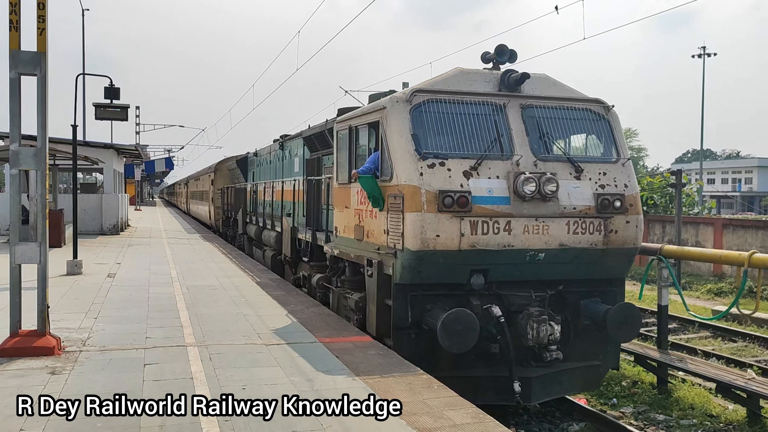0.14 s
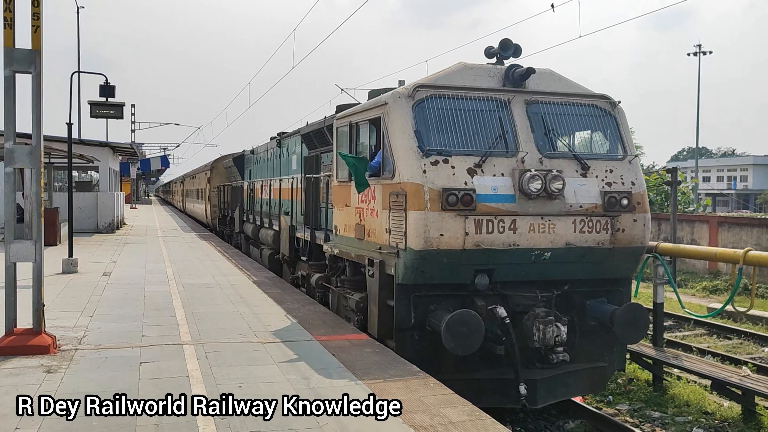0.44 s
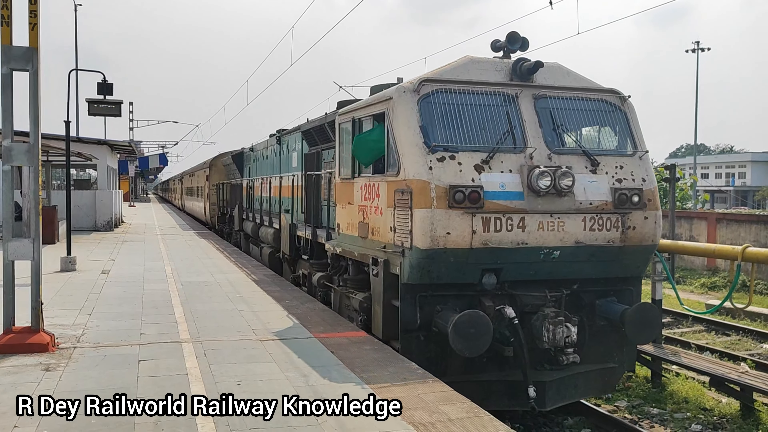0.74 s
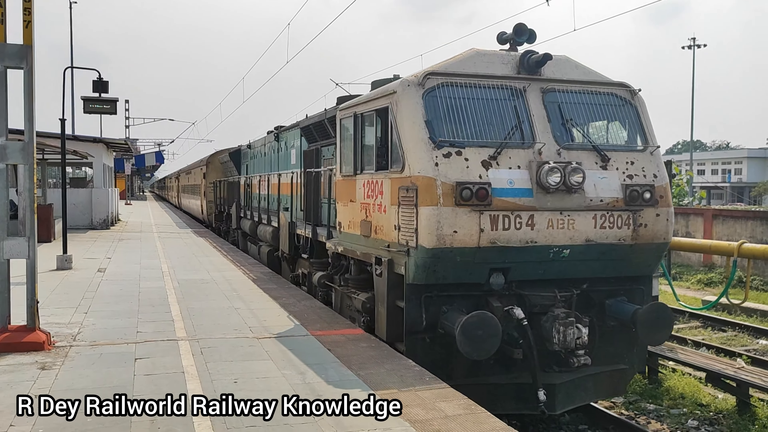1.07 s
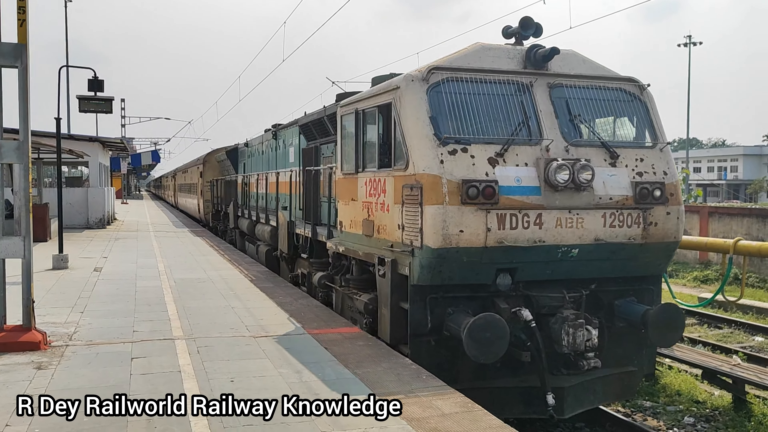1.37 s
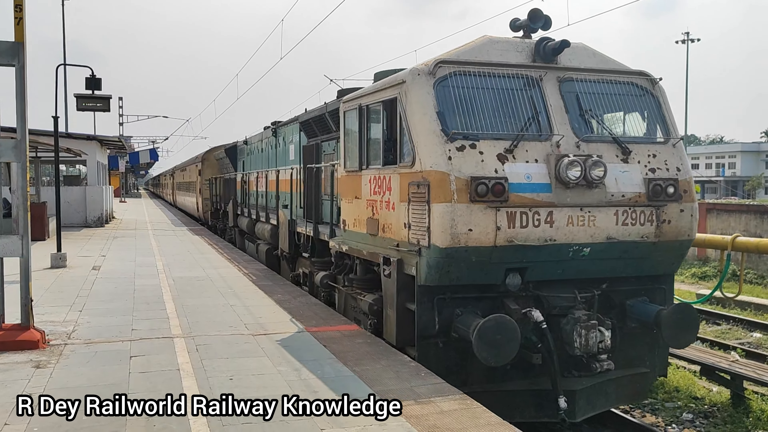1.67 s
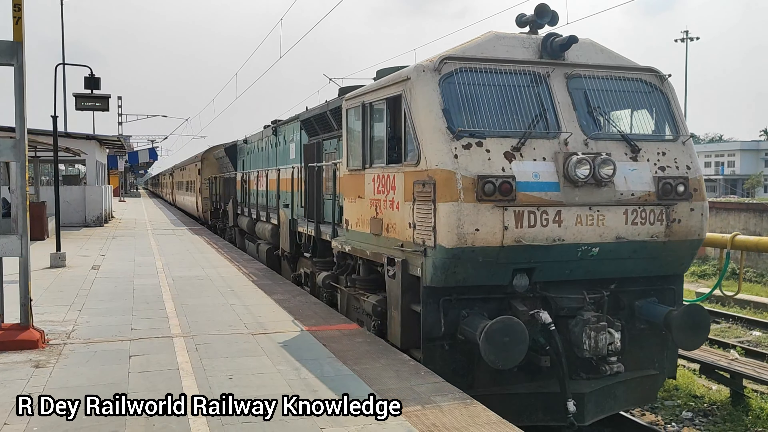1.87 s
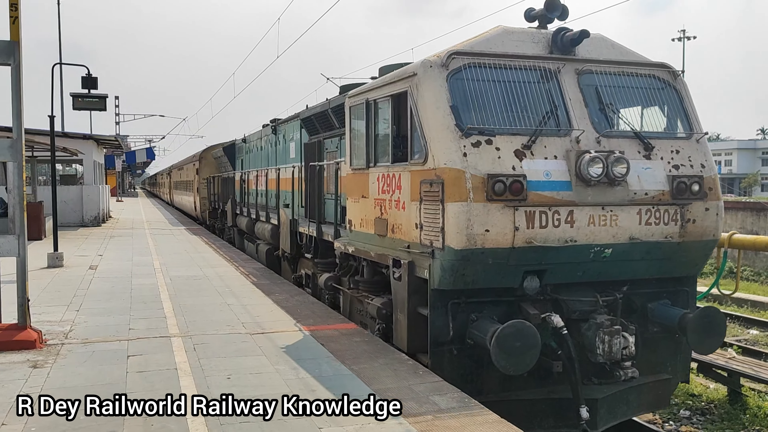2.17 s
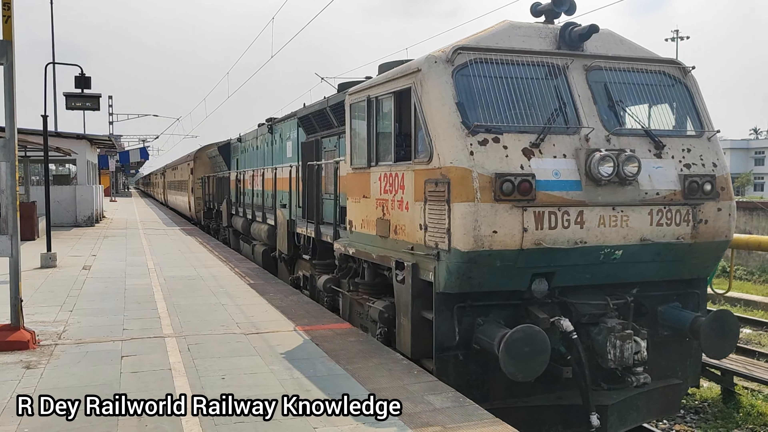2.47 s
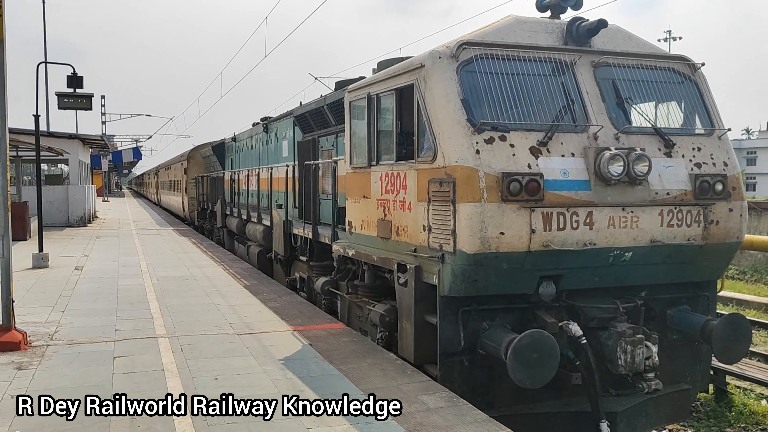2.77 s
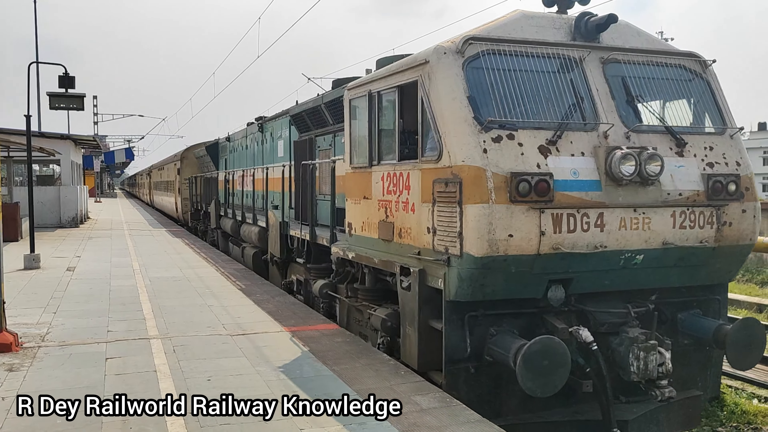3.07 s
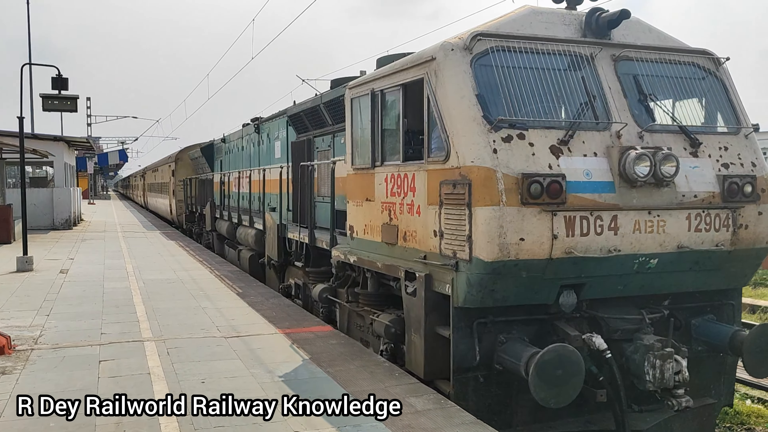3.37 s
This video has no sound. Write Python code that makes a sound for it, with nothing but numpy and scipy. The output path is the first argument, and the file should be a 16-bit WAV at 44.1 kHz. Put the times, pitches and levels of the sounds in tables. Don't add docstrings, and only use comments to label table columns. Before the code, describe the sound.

A big diesel locomotive creeps toward a station platform, its exhaust throbbing low and lumpy while whines swell and fade, steadily growing louder.

```python
import sys
import numpy as np
from scipy import signal
from scipy.fft import rfft, irfft, next_fast_len
from scipy.io import wavfile
from scipy.ndimage import uniform_filter1d, map_coordinates

SR = 44100
rng = np.random.default_rng(int(sys.argv[2]) if len(sys.argv) > 2 else 0)


def how_loud(loudness_db):
    steps = np.asarray(loudness_db, float) / 20
    return 10 ** steps


def pcm_store(signal):
    levels = np.round(np.clip(np.atleast_2d(signal), -1, 1) * 32767)
    wavfile.write(sys.argv[1], SR, levels.astype(np.int16).T)


N = 275226
T = np.arange(N) / SR
CRANK_HZ = 4.51
PORT_SHARE = np.array([[.5], [-.5]])


def unit(x):
    return x / np.sqrt(np.mean(x ** 2) + 1e-20)


def columns(rows, at, warp=lambda v: v):
    first, *rest = np.transpose(rows)
    return [np.interp(warp(at), warp(first), column) for column in rest]


def wobble(rate):
    coarse_time = T[::32]
    knots = rng.standard_normal(int(N * rate / SR) + 4)
    return np.interp(T, coarse_time, unit(map_coordinates(knots, [coarse_time * rate])))


def filtered(x, response):
    size = next_fast_len(len(x.T) + SR)
    spectrum = rfft(x, size) * response(np.fft.rfftfreq(size, 1 / SR))
    return irfft(spectrum, size)[..., :len(x.T)]


def resonances(modes):
    def response(f):
        total = 0
        for k, (centre, width, db) in enumerate(modes):
            mode = 1j * f * width / (centre * centre - f * f + 1j * f * width)
            total = total + (-1) ** k * how_loud(db) * mode
        return total
    return response


# frequency in Hz, likeness of the ports from 0 to 1,
# left lead in radians, left over right level in dB.
PORT_SPACING = [(29.8, 1, 0.051, 1.3), (127, 1, 0.064, 0.5), (290, 1, 0.11, -1), (730, 0.84, 0.58, 0.6),
                (1590, .6, 0.68, -0.2), (1880, 0.9, 1.8, 2.5), (2570, 0.2, 1.2, 2), (3000, .5, 3.1, 1.5),
                (3565, 0.2, 5.2, 0), (4210, .1, 4, -2.5), (6520, 0.4, 2.26, 7.5), (8980, 0, 4, -8.5),
                (15000, 0, 2.9, 1.5)]


def ports(direct, scattered):
    def response(hz):
        alike, lead, pan_db = columns(PORT_SPACING, hz, np.log1p)
        turn = np.arccos(np.clip(alike, -1, 1)) / 2
        offset = how_loud(PORT_SHARE * pan_db) * np.exp(1j * PORT_SHARE * lead)
        return np.cos(turn), np.sin(turn), offset
    mid = filtered(direct, lambda hz: response(hz)[0])
    side = filtered(scattered, lambda hz: response(hz)[1])
    return filtered(np.array([mid + side, mid - side]), lambda hz: response(hz)[2])


def rush(spectrum, patchy_db):
    z = signal.stft(rng.standard_normal((2, N)), nperseg=512)[2]
    patches = uniform_filter1d(rng.standard_normal(z.shape[1:]), size=5, axis=0)
    patches = uniform_filter1d(patches, size=10, axis=1)
    pair = signal.istft(z * how_loud(patchy_db * unit(patches)), nperseg=512)[1][:, :N]
    return unit(filtered(pair, lambda hz: how_loud(columns(spectrum, hz, np.log1p)[0])))


def tone(hz, fuzz_hz, rough, lead=0, pan_db=0):
    smear = np.array([wobble(fuzz_hz) + 1j * wobble(fuzz_hz) for port in PORT_SHARE]) / np.sqrt(2)
    share = np.clip(rough, 0, 1)
    carrier = np.exp(2j * np.pi * (hz * T + rng.random()))
    swing = (np.sqrt(1 - share) + np.sqrt(share) * smear) * carrier
    return np.sqrt(2) * how_loud(PORT_SHARE * pan_db) * np.real(swing * np.exp(1j * PORT_SHARE * lead))


def nearness_db():
    start_m, speed_m_s, gaining_m_s2 = 29, 0.74, .25
    return 20 * np.log10(start_m / (start_m - speed_m_s * T - gaining_m_s2 * T ** 2 / 2))


def fading(rest, swells=()):
    db, grows, flutter_db, rate = rest
    level = db + grows * nearness_db() + flutter_db * wobble(rate)
    for s, gain_db, half_s in swells:
        level = level + gain_db * np.exp(-((T - s) / half_s) ** 2)
    return level


# crank angle in degrees, strength in dB.
PUFFS = [(4.9, 0.9), (38.9, 2.3), (49.0, 2.0), (87.2, -1.2), (99.0, 0.4), (110.1, -0.7), (133.8, 1.2),
         (147.4, -4.2), (180.4, 0.9), (193.1, 0.2), (227.9, 5.3), (238.2, 1.9), (275.3, 2.2), (302.9, -4.4),
         (319.8, 1.8), (349.2, -14.1)]


def firings(scatter_db, scatter_s):
    angle, db = np.transpose(PUFFS)
    turns = np.arange(int(N / SR * CRANK_HZ) + 4)[:, None]
    s = (turns + angle / 360) / CRANK_HZ
    s = s + scatter_s * rng.standard_normal(s.shape)
    strength = how_loud(db + scatter_db * rng.standard_normal(s.shape))
    return np.bincount(np.round(s * SR).astype(int).ravel(), strength.ravel())


# frequency in Hz, width in Hz, level in dB.
STACK_MODES = [(35.4, 3.0, -56.3), (76.3, 10.9, -35.5), (92.0, 6.0, -30.6), (136, 9.0, -56),
               (176.2, 15.0, -59.6)]


def exhaust():
    ring = filtered(firings(scatter_db=.25, scatter_s=.00006), resonances(STACK_MODES))
    ring = unit(ring[round(2 * SR / CRANK_HZ):][:N])

    def approaching_band(hz):
        return 1 / (1 + (hz / 88) ** 20) / (1 + (50 / (hz + 1)) ** 20)
    low = filtered(ring, approaching_band)
    near = nearness_db()
    low_db = -25.5 + 1.07 + (2.74 - 0.52 * near) * near
    ring = how_loud(low_db) * low + how_loud(-22.5) * (ring - low)
    return ports(ring, 0.44 * ring)


# frequency in Hz, width in Hz, level in dB.
BLOCK_PANELS = [(228, 40, -4), (346, 60, -11), (394, 40, -8.5), (635, 38, -7), (725.4, 54, 0.5),
                (756, 60, -7)]
# teeth per crank turn, level in dB against the block.
GEAR_TRAIN = [(33, -20), (38, -29), (40, -15.5), (44, -19.5), (53, -17.5), (64, -23.5), (71, -23),
              (76, -17.5), (90, -18.5), (96, -22.5), (100, -21.5), (141, -19.5), (149, -17), (153, -12),
              (154, -13), (157, -33), (158, -14), (159, -15), (160, -35), (161, -17), (163, -14.5),
              (165, -20), (167, -16), (175, -24), (220.7, -20.5), (237, -21)]
# frequency in Hz, density in dB per Hz.
ROAR_COLOUR = [(20, -53), (35, -26), (52, -7.5), (85, -8.5), (120, -15), (170, -8.5), (330, -11.5),
               (500, -18.5), (620, -12.5), (720, -5.5), (850, -12), (1100, -20.5), (2200, -17), (2550, -24),
               (2750, -43.5), (3050, -55.5)]


def block():
    def panels(f):
        thin = (1j * f / (200 + 1j * f)) ** 2
        return resonances(BLOCK_PANELS)(f) * thin
    knock = unit(filtered(firings(scatter_db=4.0, scatter_s=.00005)[:N], panels))
    roar = rush(ROAR_COLOUR, patchy_db=0.78) * how_loud(0.28 * wobble(2.4) + 0.26 * wobble(20))
    gears = 0
    for teeth, db in GEAR_TRAIN:
        mesh_hz = teeth * CRANK_HZ * 1.0003
        gears = gears + how_loud(db + 2.2 * wobble(.8)) * tone(mesh_hz, 2, .08, lead=.4)
    body = ports(how_loud(-8) * knock + how_loud(1.5) * roar[0], how_loud(3) * roar[1])
    return how_loud(-30 + 1.14 * nearness_db()) * (body + gears)


# frequency in Hz, fuzz in Hz, left lead in radians, left over right in dB.
WHINE_PITCH = [
    (1492.9, 6, 1.0, 0),
    (2139, 30, 1.0, 2),
    (2188.7, 8, .9, 2),
    (2560.1, 6, .3, 1),
]
# level in dB, growth in dB per dB of nearness, flutter in dB,
# flutter rate per second.
WHINE_LEVEL = [
    (-46.5, 0.24, 0.2, 7.4),
    (-54, 1.9, 3.5, 14),
    (-50, 0.9, 2.1, 12),
    (-53, 0.76, 2, 9.9),
]
# time in seconds, gain in dB, half length in seconds.
LOW_GEAR_SWELLS = [
    (.55, 2.5, 0.33),
    (2.4, 3, 1),
    (4.3, 4.5, 1),
    (6.17, 4, 0.065),
]
HIGH_GEAR_SWELLS = [(1.41, 11, 0.061), (1.74, 4.4, 0.08), (2.1, 12, 0.074), (2.8, 11.5, .08),
                    (3.369, 8.4, 0.15), (4.15, 9, 0.45), (5.1, 5.8, 0.48), (5.6, 8.9, 0.045),
                    (5.95, 7.4, 0.099)]
PINION_SWELLS = [(.5, 6.4, .3), (1.78, 11.6, 0.14), (2.3, 5.2, 0.26), (2.62, 7.2, 0.13), (3.3, 3.3, 0.16),
                 (4.2, 4.3, .12), (5.03, 10.4, 0.1), (5.3, 8.9, 0.028), (6.1, 6.3, 0.036)]
GENERATOR_SWELLS = [(.5, 7.8, 0.12), (1.25, 10, 0.24), (1.68, 8.3, 0.076), (2.4, 9, 0.26),
                    (2.8, 5.6, 0.048), (3.4, 6, 0.19), (3.9, 7, 0.27), (4.65, 6.3, 0.54), (5.3, 5.3, 0.065),
                    (5.87, 7.3, 0.045), (6.1, 5.1, .07)]


def whines():
    swells = [LOW_GEAR_SWELLS, HIGH_GEAR_SWELLS, PINION_SWELLS, GENERATOR_SWELLS]
    total = 0
    for (hz, fuzz_hz, lead, pan_db), rest, swell in zip(WHINE_PITCH, WHINE_LEVEL, swells):
        rough = np.clip(fuzz_hz / 55, 0, 1)
        total = total + how_loud(fading(rest, swell) + 3.5) * tone(hz, fuzz_hz, rough, lead, pan_db)
    return total


# time in seconds, gain in dB,
# half length in seconds.
BLADE_SWELLS = [(.08, 8.5, 0.11), (.3, 4.5, .06), (.7, 3.5, 0.26), (1.13, 7.5, 0.04), (1.29, 7.5, 0.051),
                (1.65, 8.5, .1), (2.07, 7, 0.18), (2.3, 6.5, .1), (2.57, 4, 0.039), (2.19, -24, 0.018),
                (3.06, -13, 0.022), (3.13, 6, 0.11), (3.421, -16, 0.023), (3.85, 9, 0.28), (4.26, 8.5, .04),
                (4.41, 5, 0.03), (4.9, 11.5, 0.34), (5.16, 4, 0.039), (5.46, 7.5, .1), (6.1, 8, 0.046)]
# frequency in Hz, fuzz in Hz, level in dB, left over right in dB,
# smeared share from 0 to 1.
FAN_TONES = [(4336, 86, -56, 3, 0.52), (6500, 110, -67, 4, 0.62), (7960, 50, -69.5, -10, 0.93),
             (12459, 50, -75, -7, .85), (13644, 200, -80, -5, .85)]


def turbo():
    blade_hz = 3990.2
    blade_db = fading((-56.5, 0.5, -0.2, 11), BLADE_SWELLS)
    third_db = fading((-69.5, 3, -0.5, 12))
    blade = how_loud(blade_db + 7.5) * tone(blade_hz, 60, 0.09, lead=-1.69)
    third = how_loud(third_db + 4.0) * tone(3 * blade_hz, 160, .85, lead=-0.47, pan_db=-6.5)
    fans = 0
    for hz, fuzz_hz, db, pan_db, rough in FAN_TONES:
        fans = fans + how_loud(db) * tone(hz, fuzz_hz, rough, lead=2.4, pan_db=pan_db)
    return blade + third + fans


# frequency in Hz, density in dB per Hz.
HISS_COLOUR = [(2600, 5), (3000, 1.5), (3700, -1), (4000, 7), (4400, -7), (4800, -8), (6600, -6.5),
               (7100, -12.5), (7450, -31), (8450, -20), (8900, -6.5), (11500, -14), (12000, -9.5),
               (12700, -14.5), (15500, -30)]


def air():
    closeness = (T / T[-1]) ** 2
    puff = np.exp(2.2 * (np.cos(2 * np.pi * (CRANK_HZ * T - .04)) - 1))
    puff_db = closeness * (2.5 * puff + 2.6 * puff ** 12)
    hiss_db = -59 + 15.5 + 1.2 * nearness_db()
    return how_loud(hiss_db + puff_db + 0.42 * wobble(13)) * ports(*rush(HISS_COLOUR, patchy_db=1.5))


def scene():
    return exhaust() + block() + whines() + turbo() + air()


# frequency in Hz, step in dB over the usual level.
ROUNDING_STEPS = [(900, -22), (1200, -9), (2000, -12), (2500, -8), (2800, 3.5), (4300, 3.5), (4550, 5),
                  (5000, 5), (5400, 4.5), (5700, 2.5), (6400, 1), (7000, 4), (7600, 13), (8500, 10),
                  (9000, 3), (11000, 5.5), (12700, 9.5), (13600, 7), (15000, 7)]


def coarse_rounding(x, sway_db, short_share):
    m, front = 1024, 1024 - 110
    n, k = np.arange(2 * m), np.arange(m)
    hz = (k + .5) * SR / 2 / m
    window = np.sin(np.pi * (n[:, None] + .5) / (2 * m))
    basis = window * np.cos(np.pi / m * np.outer(n + .5 + m / 2, k + .5)) * np.sqrt(2 / m)
    frames = N // m + 2
    halves = np.pad(x, ((0, 0), (front, (frames + 1) * m - N - front))).reshape(2, -1, m)
    z = np.concatenate([halves[:, :-1], halves[:, 1:]], -1) @ basis

    def turn(v):
        return np.where(hz < 5500, np.array([v[0] + v[1], v[0] - v[1]]) / np.sqrt(2), v)
    usual = signal.medfilt(np.sqrt(np.mean(z ** 2, (0, 1))), 41)
    sway = unit(uniform_filter1d(rng.standard_normal((frames, m // 16)), size=2, axis=0))
    busy_db = np.linspace(-.7, 4.3, frames)[:, None]
    step_db = busy_db + columns(ROUNDING_STEPS, hz, np.log1p)[0] + sway_db * np.repeat(sway, 16, -1)
    step = (usual + 1e-9) * how_loud(step_db)
    turned = turn(z)
    rounded = turn(np.sign(turned) * np.floor(abs(turned) / step + .4) * step)
    spared = np.repeat(rng.random(frames) < short_share, 2)[:frames, None]
    y = np.where(spared, how_loud(-4 * (hz > 2700)) * z, rounded) @ basis.T
    out = np.pad(y[..., :m], ((0, 0), (0, 1), (0, 0))) + np.pad(y[..., m:], ((0, 0), (1, 0), (0, 0)))
    return out.reshape(2, -1)[:, front:][:, :N]


def band_limit(x):
    return signal.sosfilt(signal.butter(12, 15740, fs=SR, output="sos"), x)


# frequency in Hz, gain in dB.
NOTCH_AND_TOP = [(7100, 0), (7450, -12), (7800, -9), (7970, -4), (8150, -10), (8400, -14), (8650, 0),
                 (15480, 0), (15520, -90)]


def record(dry):
    soft = dry / (1 + abs(dry / .5) ** 4) ** (1 / 4)
    soft = filtered(soft, lambda hz: how_loud(columns(NOTCH_AND_TOP, hz)[0]))
    lead_in = np.arange(N) < 110
    coarse = coarse_rounding(soft, sway_db=2, short_share=.09)
    return band_limit(np.where(lead_in, soft, coarse))


dry = scene()
out = record(dry)
pcm_store(out)
```